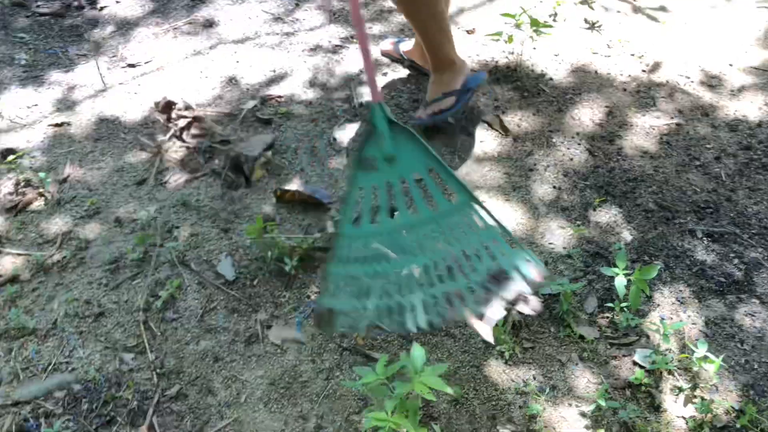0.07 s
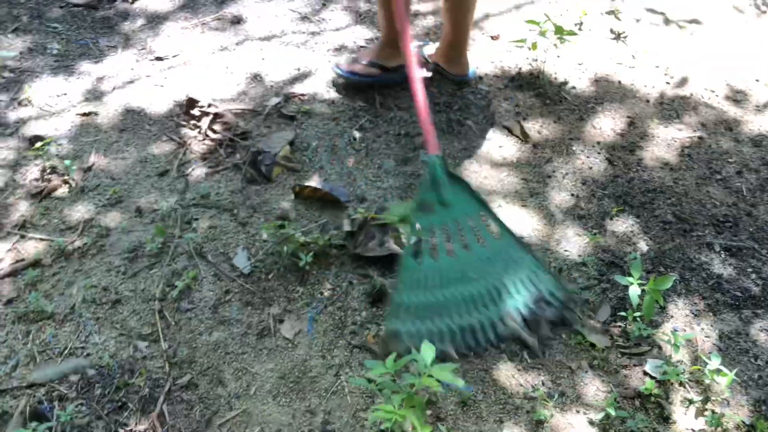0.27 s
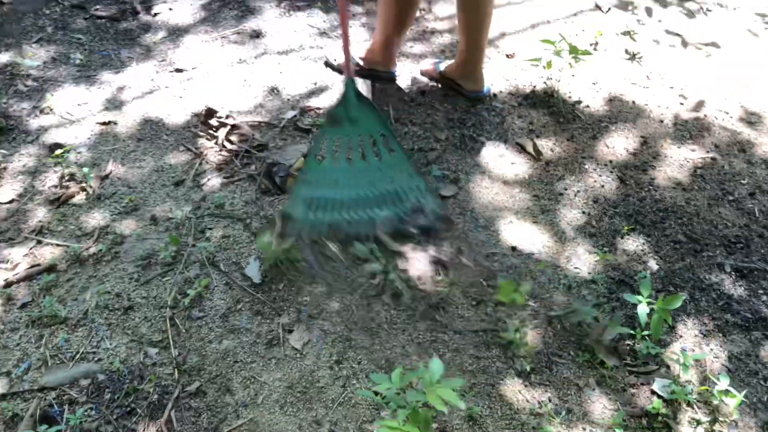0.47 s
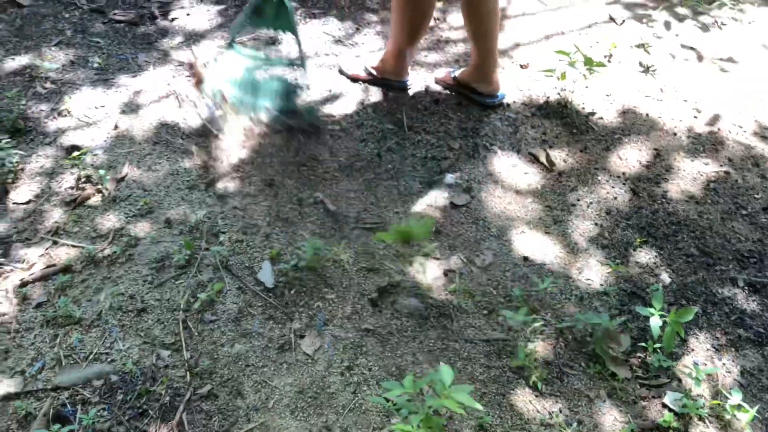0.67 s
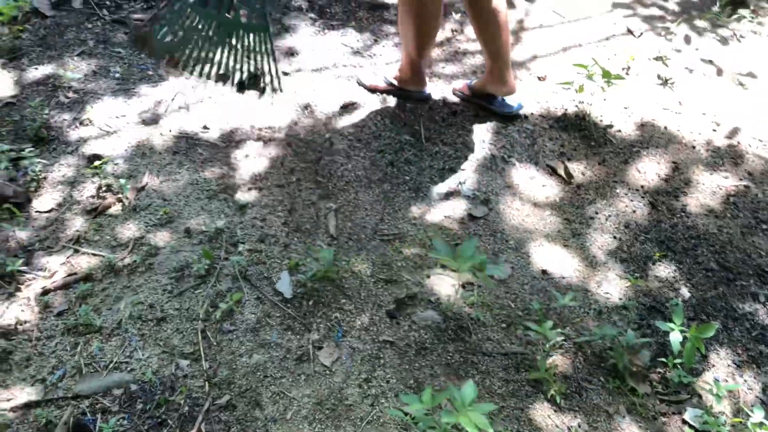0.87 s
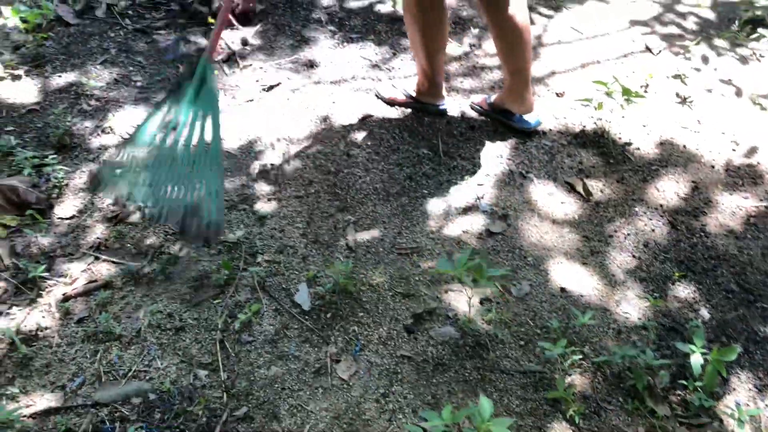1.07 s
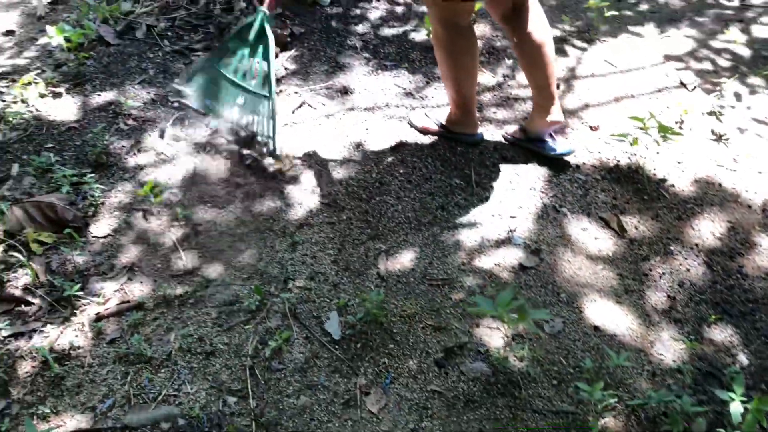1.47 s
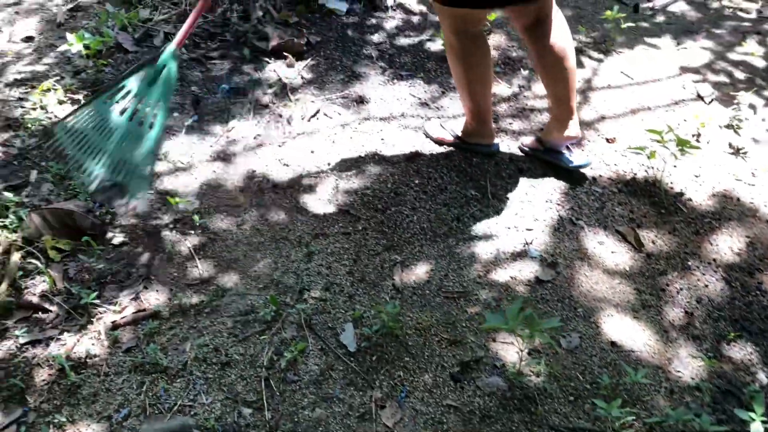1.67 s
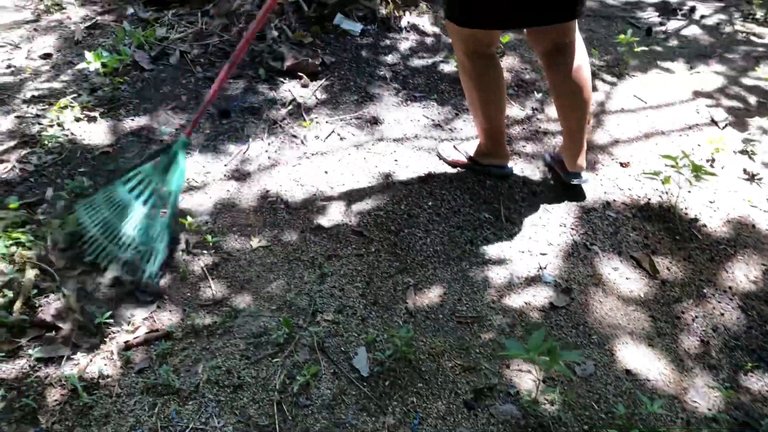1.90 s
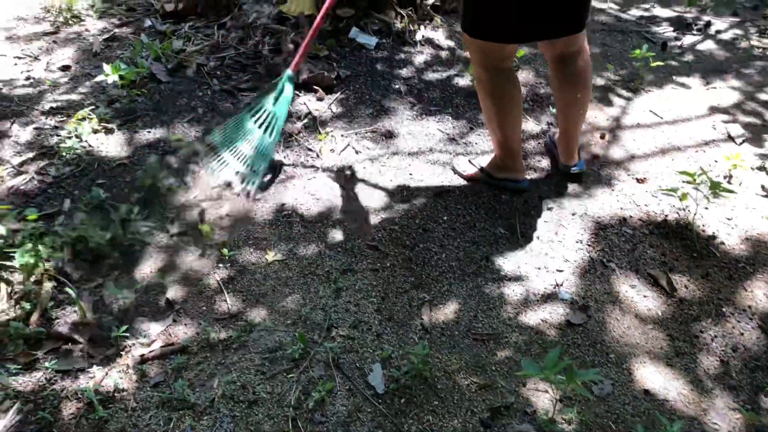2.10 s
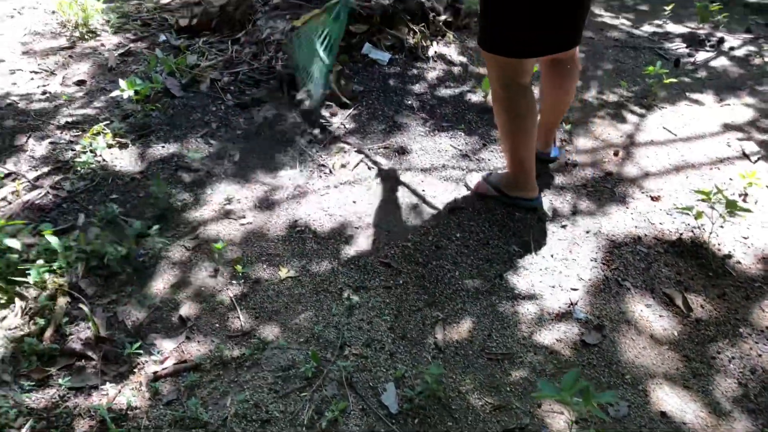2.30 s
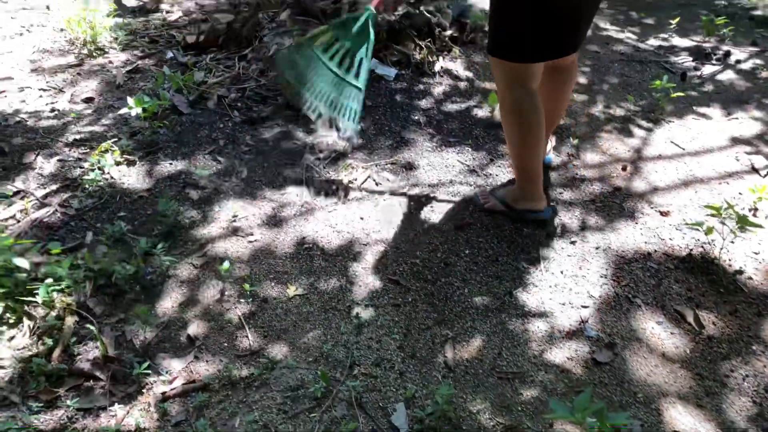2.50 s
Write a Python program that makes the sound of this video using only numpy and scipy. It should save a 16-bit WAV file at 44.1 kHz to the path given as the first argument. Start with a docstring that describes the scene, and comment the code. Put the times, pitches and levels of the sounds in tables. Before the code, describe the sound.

Three rasping rake strokes across gritty soil, with rustling leaves and ticking twigs.

```python
"""Over a low outdoor rumble and a thin buzz of insects, dry leaves stir and a twig ticks.
A plastic fan rake drags over sandy ground: its tines catch, slip and rasp, and sand hisses under them.
A shorter, lighter stroke follows at 1.2 s and a third at 1.8 s. Along the way the soil thuds softly,
twigs and pebbles tick, and after each stroke grit and leaves tumble, settling at the end.
One microphone, no walls."""
import sys
import numpy as np
from scipy import signal
from scipy.fft import rfft, irfft, next_fast_len
from scipy.io import wavfile
from scipy.ndimage import uniform_filter1d, map_coordinates

SR = 44100
rng = np.random.default_rng(int(sys.argv[2]) if len(sys.argv) > 2 else 0)


def transcribe(signal):
    """Save signal, clipped to [-1, 1], as a 16-bit WAV file at the path in sys.argv[1]."""
    frames = np.atleast_2d(signal).T
    limited = np.clip(frames, -1, 1)
    pcm = np.round(limited * 32767).astype(np.int16)
    wavfile.write(sys.argv[1], SR, pcm)


N = 116865
TIME_S = np.arange(N) / SR
LOW_CUT_HZ, TOP_HZ = 59, 15750


def amp(db):
    """Decibels to gain."""
    return 10 ** (np.asarray(db) / 20)


def unit(x):
    """Scaled to rms 1."""
    return x / np.sqrt(np.mean(x ** 2) + 1e-20)


def wobble(per_s):
    """A smooth random curve with per_s knots a second."""
    return map_coordinates(rng.standard_normal(N), [TIME_S * per_s], order=2)


def coloured(x, eq):
    """x through a causal EQ of (freq_hz, gain_db) points, at rms 1."""
    size = 2 * next_fast_len(N)
    hz, db = np.transpose(eq)
    log_hz = np.log(np.fft.rfftfreq(size, 1 / SR) + 1)
    log_gain = np.log(amp(np.interp(log_hz, np.log(hz), db)))
    cepstrum = irfft(log_gain) * (1 + np.sign(size // 2 - np.arange(size)))  # minimum phase
    cepstrum[0] /= 2
    return unit(irfft(rfft(x, size) * np.exp(rfft(cepstrum)))[:N])


def add(track, start_s, sound):
    """Mix a sound into the track."""
    part = track[max(round(start_s * SR), 0):][:len(sound)]
    part += sound[:len(part)]


def crunch(per_s, decay_s, spread_db):
    """Tiny noise bursts of uneven size at random moments."""
    hits = (rng.random(N) < per_s / SR) * amp(spread_db * np.clip(rng.standard_normal(N), -2, 2))
    energy = signal.lfilter([1], [1, -np.exp(-2 / (decay_s * SR))], hits ** 2)
    return unit(np.sqrt(energy) * rng.standard_normal(N))


def patchy(x, depth_db):
    """Shifts the colour of x in random patches, a few hundred Hz wide and some 50 ms long."""
    spectrum = signal.stft(x, nperseg=512)[2]
    patches = uniform_filter1d(rng.standard_normal(spectrum.shape), size=4, axis=0)
    patches = uniform_filter1d(patches, size=9, axis=1)
    return signal.istft(spectrum * amp(depth_db * unit(patches)), nperseg=512)[1][:N]


# Tone of the bass-heavy bed and of the insects' narrow buzz: freq_hz, gain_db
RUMBLE_EQ = [(20, -3), (45, 0), (64, 7.5), (85, -2), (115, 3), (160, -2.5), (250, -4.5), (450, -9),
             (1000, -14), (1600, -14), (3000, -14), (5500, -21.5), (11000, -42), (15500, -31)]
INSECT_EQ = [(5000, -21), (6400, -6.5), (6750, -1), (6950, 1), (7150, -3), (7550, -10), (8000, -8),
             (8400, -15), (9500, -22), (12800, -17), (13700, -16), (14300, -16), (15500, -12)]


def outdoors(rumble_db=-49, insect_db=-51.5):
    """A steady bed of distant rumble and thinly buzzing insects."""
    rumble = amp(rumble_db) * coloured(rng.standard_normal(N), RUMBLE_EQ)
    insects = amp(insect_db) * coloured(rng.standard_normal(N), INSECT_EQ)
    return rumble + insects


# Soft thuds of the fan and sandals on the soil: start_s, level_db, pitch_hz
SOIL_THUDS = [(0.449, -34, 228), (.78, -42, 274), (1.365, -42, 150), (2.183, -39.5, 234)]


def thuds(rise_s=0.0065, t60_s=0.1, q=2):
    """The soil takes a weight with a low, dull puff."""
    out = np.zeros(N)
    for start_s, level_db, pitch_hz in SOIL_THUDS:
        t = np.maximum(TIME_S - start_s, 0)
        puff = unit(signal.lfilter(*signal.iirpeak(pitch_hz, q, SR), rng.standard_normal(N)))
        out += puff * amp(level_db - 60 * t / t60_s) * (1 - np.exp(-t / rise_s))
    return out


# Twigs and pebbles flicked by the tines: start_s, ring_db, pitch_hz, crack_db
TWIG_TICKS = [(.118, -25, 4020, -35), (.156, -18, 6770, -40), (.171, -31, 6620, -37),
              (0.192, -15, 3900, -31), (.1965, -9, 4040, -31.5), (0.2371, -17, 3370, -30),
              (.782, -30, 1630, -33.5), (.821, -25, 1520, -30), (.947, -29, 1520, -46),
              (1.473, -27, 2700, -38), (1.499, -26, 13000, -40), (1.589, -22, 6900, -39),
              (1.594, -31, 2600, -48), (1.625, -34, 2920, -36), (1.7153, -18, 6250, -34.5),
              (1.7413, -30, 2370, -37), (1.91, -26, 3900, -28.5), (2.182, -20, 1620, -27),
              (2.1866, -17, 1410, -34), (2.1911, -16, 1530, -27), (2.3069, -21.5, 1850, -28.5),
              (2.3317, -29, 4930, -28), (2.3514, -34, 4090, -35), (2.42, -39, 1700, -43),
              (2.442, -28, 4000, -38), (2.474, -32, 2980, -32.5), (2.503, -25, 3930, -39),
              (2.622, -23, 7060, -39)]
# Mid-forward tone of their crack: freq_hz, gain_db
CRACK_EQ = [(200, -4.5), (1500, 6), (5000, -1), (9000, -3), (15500, -12)]


def ticks(ring_t60_cycles=15, rise_s=0.0005, crack_t60_s=0.012):
    """A twig or pebble gives a dry crack and a few cycles of ring."""
    rings, crack_envelope = np.zeros(N), np.zeros(N)
    t = np.arange(SR // 25) / SR
    for start_s, ring_db, pitch_hz, crack_db in TWIG_TICKS:
        envelope = amp(ring_db - 60 * t * pitch_hz / ring_t60_cycles) * (1 - np.exp(-t / rise_s))
        add(rings, start_s, envelope * np.sin(2 * np.pi * pitch_hz * t))
        add(crack_envelope, start_s, amp(crack_db - 60 * t / crack_t60_s))
    return rings + crack_envelope * coloured(rng.standard_normal(N), CRACK_EQ)


# Wide, airy tone of moving sand: freq_hz, gain_db
SAND_EQ = [(150, 0), (450, -11), (800, -2.5), (2500, -7.5), (6000, -2.5), (9500, -2), (12000, -1.5),
           (15500, -2)]


def sand():
    """Thousands of tiny grain impacts a second blur into a hiss."""
    return coloured(crunch(per_s=4900, decay_s=0.00024, spread_db=-0.5), SAND_EQ)


def crumbs(per_s=350, centre_hz=3120, spread_octaves=1.25, decay_cycles=4.7, spread_db=1.5):
    """Crumbs of earth land, each with a brief pitch of its own."""
    out, t = np.zeros(N), np.arange(SR // 100) / SR
    for start_s in TIME_S[rng.random(N) < per_s / SR]:
        pitch_draw, level_draw = np.clip(rng.standard_normal(2), -2, 2)
        hz = min(centre_hz * 2 ** (spread_octaves * pitch_draw), TOP_HZ)
        ping = np.sin(2 * np.pi * hz * t) * np.exp(-hz * t / decay_cycles)
        add(out, start_s, np.sqrt(hz) * amp(spread_db * level_draw) * ping)
    return unit(out)


# Fader moves for the tumbling leaves and sand: time_s, leaves_db, trickle_db
DEBRIS_LEVELS = [(0, -45.5, -44), (.04, -45.5, -46.5), (.09, -50.5, -51.5), (.2, -59, -48),
                 (.3, -35.5, -63), (.7, -40.5, -41.5), (.82, -40.5, -44.5), (.93, -43, -48),
                 (1.02, -48, -48.5), (1.15, -51.5, -49), (1.42, -53, -44.5), (1.55, -51, -47),
                 (1.68, -56.5, -55.5), (1.79, -51, -56.5), (2.2, -39, -44.5), (2.29, -42, -42),
                 (2.35, -37, -45.5), (2.43, -45.5, -51), (2.5, -46.5, -59), (2.55, -49, -77),
                 (2.65, -53.5, -68)]
# Papery tone of the leaves and crumbs: freq_hz, gain_db
LEAF_EQ = [(150, -15), (450, -8), (750, -1.5), (1050, -3.5), (1550, 2.5), (2100, 1), (3200, -1),
           (4500, 1.5), (5600, -2.5), (7200, -5), (9000, -7), (12000, -19), (15500, -16)]


def debris(crumb_mix_db=-9):
    """Dry leaves rustle among falling crumbs while sand trickles."""
    times_s, leaves_db, trickle_db = np.transpose(DEBRIS_LEVELS)
    rustle = crunch(per_s=1300, decay_s=0.00096, spread_db=1) + amp(crumb_mix_db) * crumbs()
    leaves = coloured(rustle, LEAF_EQ) * amp(np.interp(TIME_S, times_s, leaves_db))
    trickle = sand() * amp(np.interp(TIME_S, times_s, trickle_db))
    return leaves + trickle


def slips():
    """Tines catch and let go in a dense, uneven crackle."""
    return crunch(per_s=2800, decay_s=0.0013, spread_db=4)


# Accents where the tines dig in: centre_s, half_length_s, pitch_hz, level_db
TINE_RASPS = [(0.289, 0.023, 814, -40), (0.393, 0.032, 3850, -31), (0.501, 0.022, 3320, -27.5),
              (.61, 0.06, 1390, -37), (0.784, 0.014, 750, -45.5), (1.875, 0.044, 1040, -40.5),
              (1.992, 0.019, 2520, -35), (2.085, 0.047, 2100, -37.5), (2.372, 0.009, 810, -42)]


def rasps(q=2.16):
    """Where the fan bends hard, its slips gather in one broad resonance."""
    out = np.zeros(N)
    for centre_s, half_length_s, pitch_hz, level_db in TINE_RASPS:
        band = unit(signal.lfilter(*signal.iirpeak(pitch_hz, q, SR), slips()))
        swell = np.exp(-0.5 * ((TIME_S - centre_s) / half_length_s) ** 2)
        out += band * amp(level_db) * swell
    return out


def tines(modes=400, t60_s=0.07, ring_mix_db=-9.5):
    """Slips briefly ring the many modes of the plastic tines."""
    crackle, t = slips(), np.arange(SR // 8) / SR
    mode_hz = np.linspace(700, 9000, modes)[:, None] * (1 + 0.01 * rng.standard_normal((modes, 1)))
    ring = np.sin(2 * np.pi * (mode_hz * t + rng.random((modes, 1)))).sum(0) * amp(-60 * t / t60_s)
    return crackle + amp(ring_mix_db) * unit(signal.fftconvolve(crackle, ring)[:N])


# Fader moves, one list per stroke: time_s, scrape_db, sand_db
STROKE_LEVELS = [
    [(.22, -46, -40.5), (.245, -35.5, -37), (.268, -36, -29.5), (.31, -37.5, -35), (.35, -42, -32),
     (.368, -31.5, -30), (.46, -29.5, -30.5), (.54, -30, -30.5), (.6, -27, -31), (.645, -30, -31),
     (.675, -38, -38), (.73, -51, -57)],
    [(1.178, -44, -43.5), (1.205, -42.5, -40), (1.235, -37, -34.5), (1.3, -35.5, -29.5),
     (1.365, -38.5, -36), (1.392, -47.5, -42), (1.435, -45, -44), (1.46, -51, -53)],
    [(1.81, -48, -54), (1.85, -47, -43), (1.866, -37.5, -37), (1.925, -37, -40.5), (1.945, -32, -33.5),
     (1.98, -32.5, -32), (2.04, -31, -38.5), (2.115, -32.5, -33), (2.165, -38, -38), (2.205, -55, -47)],
]
# Tone of the scrape, one list per stroke as the fan bends differently: freq_hz, gain_db
SCRAPE_EQS = [
    [(80, -20), (220, -7.5), (430, -9.5), (750, -3.5), (1100, -3.5), (1700, 2.5), (2400, 0), (3200, 1.5),
     (4200, 2), (5200, -6.5), (6200, -3.5), (9000, -5), (12000, -22)],
    [(80, -25), (220, -6), (430, -7), (950, -7.5), (1300, 0.5), (1700, -3), (2300, 2), (3300, -2),
     (4400, 4), (5900, -1), (7000, 2.5), (8500, -18), (12000, -29)],
    [(80, -21), (220, -4.5), (430, -6), (700, -6), (1000, -4), (2000, 0.5), (3000, -2), (4100, 0),
     (5200, -4), (6900, -2), (8500, -12.5), (12000, -36)],
]


def rake(fade_s=0.015, sand_trim_db=0.5, judder_per_s=83, judder_db=0.51):
    """Each stroke: the tines scrape, sand streams past them and the whole fan judders."""
    out = np.zeros(N)
    for stroke, eq in zip(STROKE_LEVELS, SCRAPE_EQS):
        times_s, scrape_db, sand_db = np.transpose(stroke)
        contact = np.clip(1 + np.minimum(TIME_S - times_s[0], times_s[-1] - TIME_S) / fade_s, 0, 1)
        scrape = coloured(tines(), eq) * amp(np.interp(TIME_S, times_s, scrape_db))
        hiss = sand() * amp(np.interp(TIME_S, times_s, sand_db) + sand_trim_db)
        judder = amp(judder_db * wobble(judder_per_s))
        out += contact * judder * (scrape + hiss)
    return out


def scene():
    """Everything reaches one microphone, alike in both channels."""
    raking = patchy(rake() + debris(), depth_db=1.5) + rasps()  # single tines come and go
    return np.tile(raking + ticks() + thuds() + outdoors(), (2, 1))


def record(dry):
    """Rolls off the deep bass and cuts everything above TOP_HZ."""
    size = 2 * next_fast_len(N)
    hz = np.fft.rfftfreq(size, 1 / SR)
    low_cut = 1 - 1 / (1 + (hz / LOW_CUT_HZ) ** 4)
    return irfft(rfft(dry, size) * low_cut * (hz < TOP_HZ), size)[:, :N]


dry = scene()
out = record(dry)
transcribe(out)
```